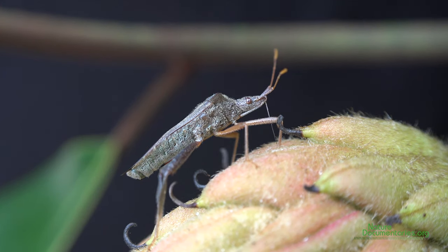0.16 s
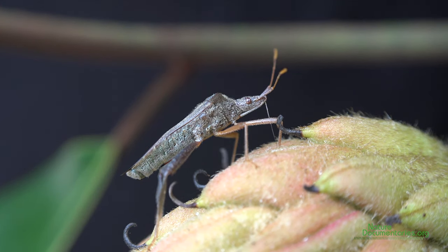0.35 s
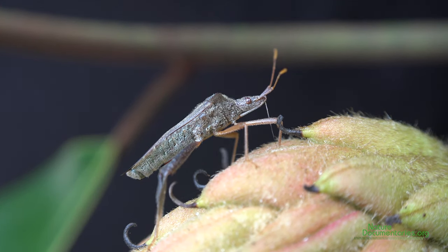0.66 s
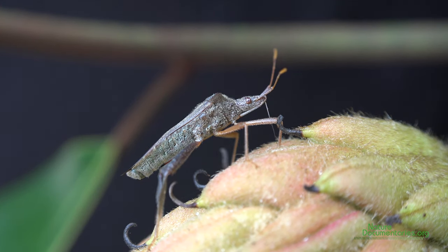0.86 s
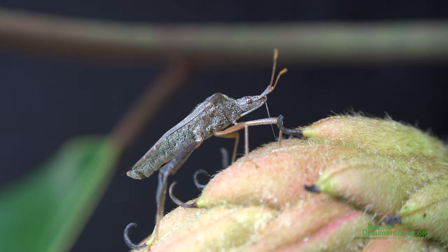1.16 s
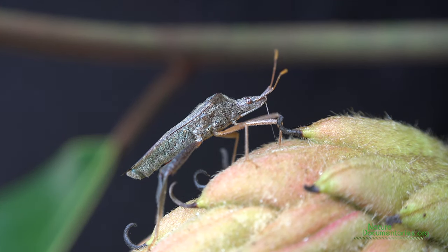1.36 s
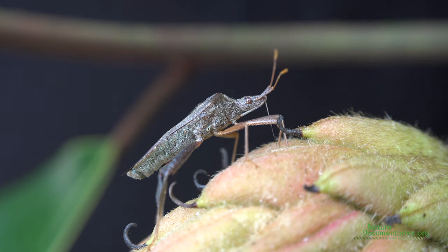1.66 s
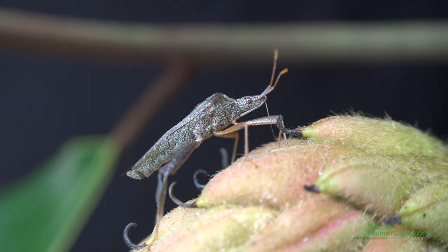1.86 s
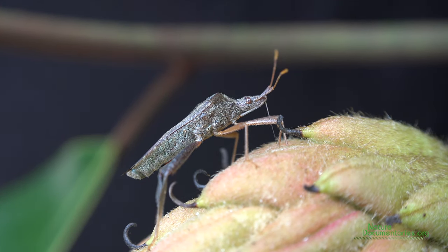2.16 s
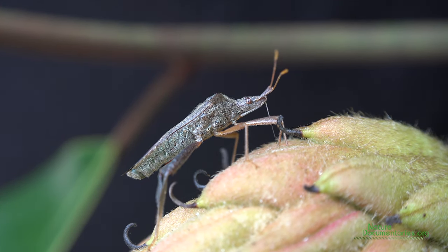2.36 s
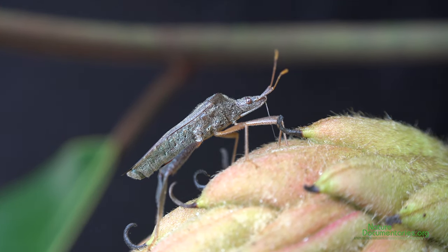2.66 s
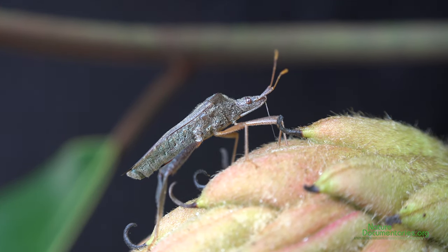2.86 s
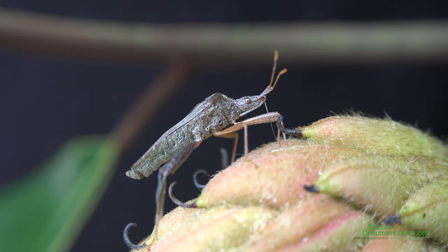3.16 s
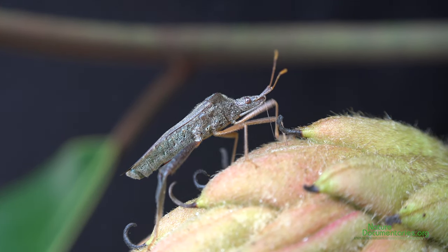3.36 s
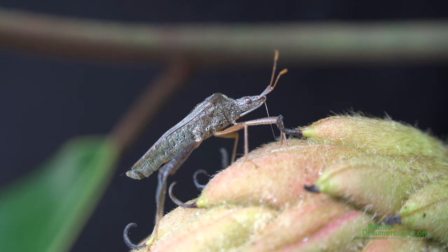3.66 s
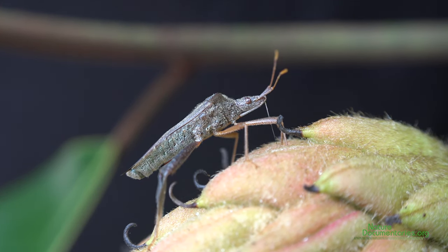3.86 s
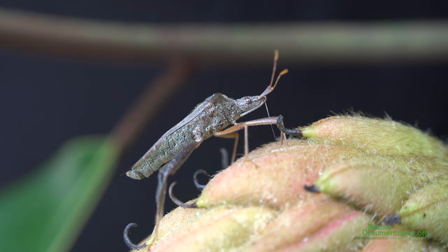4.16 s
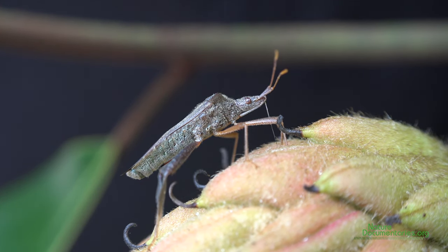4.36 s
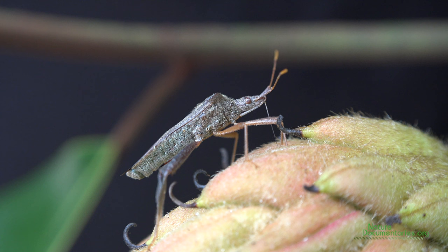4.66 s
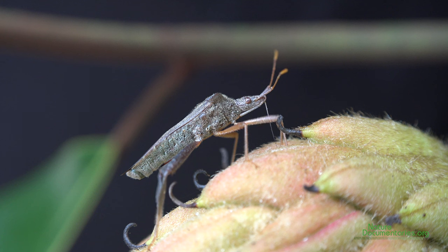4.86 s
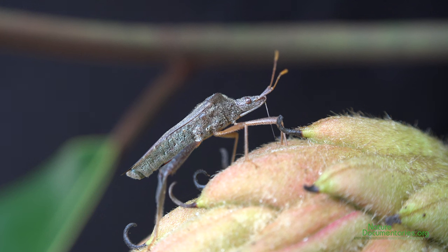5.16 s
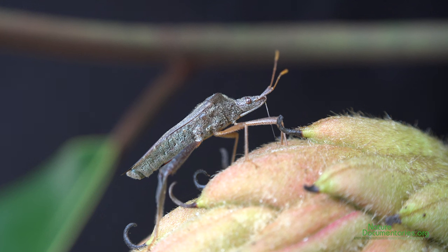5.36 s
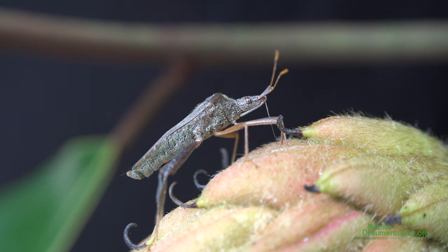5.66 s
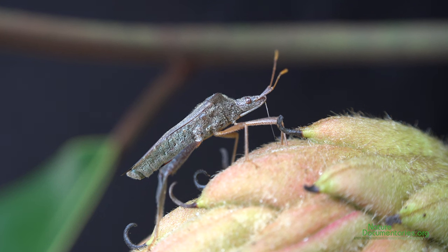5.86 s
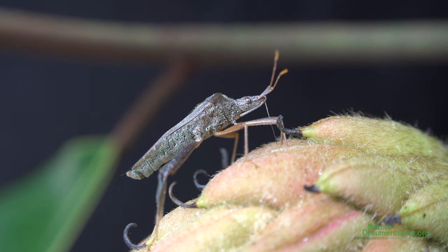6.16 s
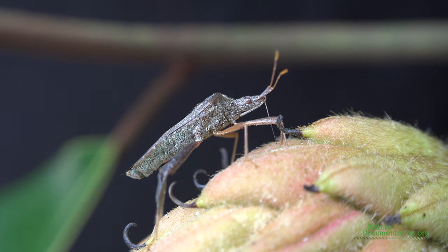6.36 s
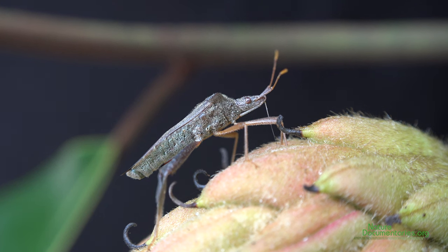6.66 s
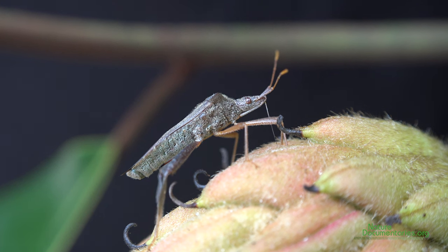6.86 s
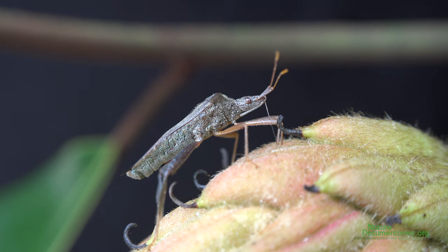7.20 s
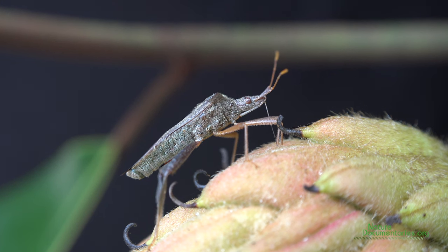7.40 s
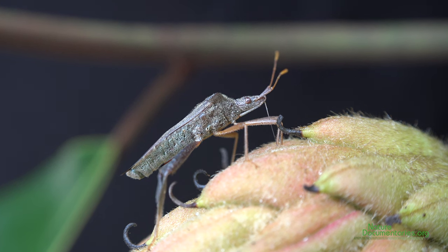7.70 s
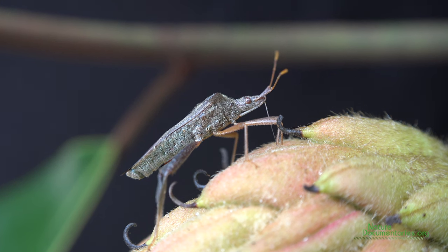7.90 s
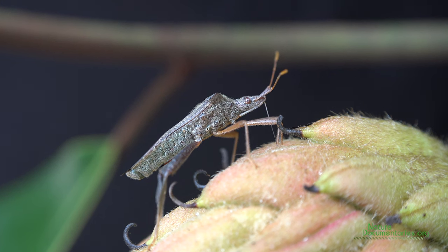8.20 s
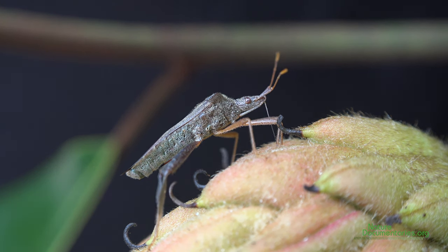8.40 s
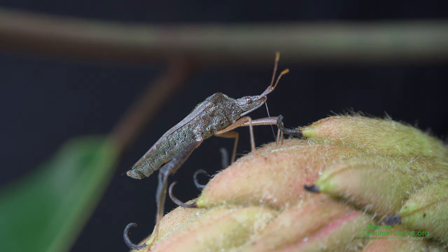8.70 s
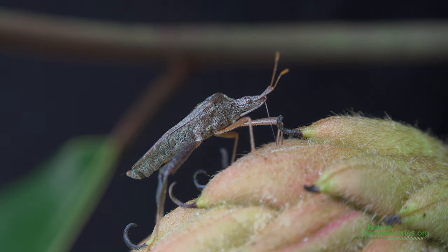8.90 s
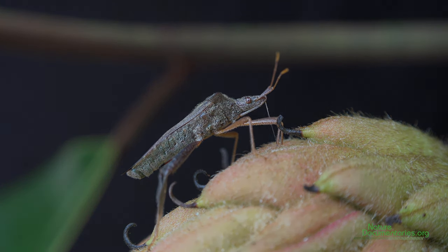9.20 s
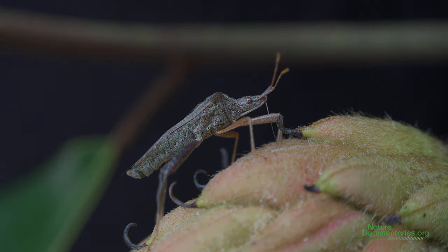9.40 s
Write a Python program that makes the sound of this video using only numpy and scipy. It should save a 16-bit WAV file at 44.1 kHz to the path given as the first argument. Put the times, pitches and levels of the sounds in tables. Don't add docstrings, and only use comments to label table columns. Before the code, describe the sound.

A near cricket chirps in bright, regular high-pitched bursts over a shimmering distant insect chorus, while traffic recedes and small twigs tick.

```python
import sys
import numpy as np
from scipy import signal
from scipy.io import wavfile
from scipy.ndimage import uniform_filter1d, minimum_filter1d

SR = 44100
rng = np.random.default_rng(int(sys.argv[2]) if len(sys.argv) > 2 else 0)


def dump(signal):
    limited = np.clip(np.atleast_2d(signal).T, -1, 1)
    pcm = np.round(limited * 32767).astype(np.int16)
    wavfile.write(sys.argv[1], SR, pcm)


def attenuation_scalar(level_db):
    decades = np.asarray(level_db, float) / 20
    return 10 ** decades


N = 420707
TIME = np.arange(N) / SR

# last stroke t/s, stroke rate f/Hz
CHIRPS = [(.0581, 72), (.7496, 71), (1.4433, 70.8), (2.1319, 70.75), (2.7863, 71), (3.4853, 70.7),
          (4.4209, 70.3), (5.1382, 71.1), (5.7883, 70.3), (6.4546, 71.2), (7.1267, 71.1), (7.7569, 71.7),
          (8.408, 70.1), (9.0563, 70.75), (9.624, 70.75)]
# number of strokes, level/dB
EFFORT = [(18., -36.5), (17.2, -37), (18.6, -38.5), (20.1, -39), (17.7, -38.5), (17.8, -39), (20.9, -37.5),
          (20.6, -38), (16.6, -37.5), (21.4, -37.5), (21.5, -39.5), (18.4, -38), (21, -40.5), (15.3, -39),
          (12., -36.5)]
# f/Hz, width/Hz, level/dB
WING_MODES = [(6770, 130, 5), (6220, 180, -0.5), (7130, 97, 5), (6180, 440, -19.5)]
# f/Hz, level/dB
SINGERS = [(5550, -34), (5800, -13.5), (6100, -9), (6400, 3.5), (6600, -1), (6760, 3), (6900, -5.5),
           (7200, -2), (7500, -6), (7650, -36)]
# end of chirp t/s, level above the blur/dB
HIGH_CHIRPS = [(.03, -2), (.8, 4), (1.52, 1.5), (2.25, 6.5), (3.0, 3), (3.76, 5), (4.5, 3), (5.2, 4),
               (6.05, 4.5), (6.82, 5), (7.5, 2), (8.3, 2), (9.05, 2)]
MIDDLE_CHIRPS = [
    (.3, 6.1),
    (2.4, 2.1),
    (3.02, 1.7),
    (5.44, 3.3),
    (6.03, 3.1),
    (7.38, 2.5),
]
# f/Hz, density level/dB
ROAR = [(180, -27), (300, -1.5), (379, -5.5), (508, -3), (681, -3), (809, 0.5), (2440, -12.5), (2690, -14),
        (4830, -20), (5330, -16.5), (5600, -13.5), (7280, -63), (12300, -120)]
# f/Hz, density level/dB
RUMBLE = [(12, -36), (20, -23.5), (54, -1), (81, -2), (135, -5.5), (184, -6), (246, -9), (302, -17),
          (420, -16.5), (550, -62), (920, -120)]
# t/s, level/dB
DRONE = [(0.0, -64), (0.26, -47.5), (0.69, -61), (0.9, -43.5), (1.2, -47.5), (1.54, -55), (1.7, -48.5),
         (3.5, -57), (4.04, -55.5), (4.38, -62), (4.67, -48), (5.25, -56), (5.61, -50.5), (6.06, -55.5),
         (6.5, -51.5), (7.35, -58), (7.6, -53), (9.3, -50)]
# t/s, hum level/dB, second harmonic level/dB
HUM = [(0.0, -60, -55), (0.5, -73, -58.5), (0.8, -70, -53), (1.1, -71, -58), (1.35, -75, -70),
       (1.6, -60, -56.5), (2.2, -62, -70.5), (2.87, -54, -66.5), (3.69, -56.5, -62), (4.12, -65.5, -73),
       (4.86, -58.5, -64.5), (5.66, -57, -65.5), (6.2, -68, -64.5), (6.6, -58, -65.5), (7.04, -53.5, -68),
       (8.0, -57, -83), (8.3, -69.5, -79), (9.54, -60.5, -69.5)]
# t/s, peak level/dB, ring f/Hz, decay t60/s
TWIGS = [
    (0.8033, -28, 2610, 0.032),
    (1.272, -44, 2510, 0.025),
    (2.098, -45.5, 2996, 0.11),
    (2.63, -48, 2500, .015),
    (2.6764, -43.5, 2400, 0.034),
    (3.27, -51, 2900, .02),
    (7.326, -46, 4400, 0.022),
    (9.5154, -49.5, 4130, 0.014),
]
# f/Hz, density level/dB
HISS = [(1500, -6), (4500, -3.5), (6500, -8.5), (8300, 2.5), (9000, -1), (11400, 0.5), (12000, -5),
        (12400, -36)]
# f/Hz, left-right likeness
SAME = [(60, 0.99), (110, 0.99), (200, 0.95), (350, 0.89), (640, 0.92), (1150, 0.99), (2080, 1.0),
        (3750, 0.99), (6770, 0.78), (12200, 0.31)]
# f/Hz, left minus right level/dB
LEAN = [(60, -1), (110, -1.2), (200, 0.5), (350, 1), (640, 0.3), (1150, -0.3), (2080, 0), (3750, -1),
        (6770, 2), (12200, -2)]
# t/s, level/dB
FADE = [(0, 0), (8.35, 0.5), (8.7, -2), (9.1, -6), (9.54, -12)]
# f/Hz, band level over amplitude step/dB
STEPS = [(200, 22), (800, 16), (1600, 9), (2300, 2), (3000, -4), (4000, -5.5), (5400, -6), (6000, 9),
         (6600, 22), (7250, 22), (7900, -3), (9300, -7.5), (11500, -7)]
# f/Hz, level relative to that band/dB
SHADOW = [(2500, -40), (4500, -28.5), (5400, -28), (6000, -35), (7250, -40), (7920, -18), (8610, -25),
          (9300, -40)]
BANDS = np.r_[0:96:8, 96:144:12, 144, 160, 176, 196, 216, 240, 264, 292, 320:577:32]


def evened(x):
    return x / np.sqrt(np.mean(abs(x) ** 2) + 1e-20)


def read(points, hz):
    f, value = np.transpose(points)
    return np.interp(np.log(hz + 1), np.log(f + 1), value)


def curves(rows):
    s, *columns = np.transpose(rows)
    return [np.interp(TIME, s, c) for c in columns]


def resonate(x, hz, width):
    turn = np.exp(2j * np.pi * np.cumsum(hz * np.ones(len(x))) / SR)
    r = np.exp(-np.pi * width / SR)
    return 2 * turn * signal.lfilter([1 - r], [1, -r], x / turn)


def drift(seconds):
    return evened(signal.lfilter([1], [1, -np.exp(-1 / (seconds * SR))], rng.standard_normal(N)))


def wash(shape, patchy_db):
    frames, hz = N // 512 + 5, np.fft.rfftfreq(2048, 1 / SR)
    a, b, c, d, patches = rng.standard_normal((frames, 1025, 5)).T
    patches = uniform_filter1d(patches, size=14, axis=0)
    patches = evened(uniform_filter1d(patches, size=8, axis=1))
    same = np.clip(read(SAME, hz), -1, 1)[:, None]
    left = a + 1j * b
    right = same * left + np.sqrt(1 - same ** 2) * (c + 1j * d)
    z = np.array([left, right]) * attenuation_scalar(read(shape, hz)[:, None] + patchy_db * patches)
    z *= attenuation_scalar(np.outer([.5, -.5], read(LEAN, hz)))[:, :, None]
    return evened(signal.istft(z, nperseg=2048, noverlap=1536)[1][:, :N])


def field(x, t60, same):
    t = np.arange(SR // 4) / SR
    both, left, right = rng.standard_normal((3, len(t))) * (t > .002) * attenuation_scalar(-60 * t / t60)
    tail = np.sqrt(same) * both + np.sqrt(1 - same) * np.array([left, right])
    x = x * np.minimum(TIME / .004, 1)
    return signal.fftconvolve(x[None], tail / np.linalg.norm(both), axes=1)[:, :N]


def pair(z, left_db, right_db, turn):
    return np.array([attenuation_scalar(left_db) * (z * np.exp(1j * turn)).real, attenuation_scalar(right_db) * z.real])


def phrases(rows, seconds):
    total_db = 0
    for end, db in rows:
        swell = 3 * (TIME - end + seconds) / seconds
        stop = (end - TIME) / 0.016 + 1
        total_db = total_db + db * np.clip(np.minimum(swell, stop), 0, 1)
    return total_db


def steady_hiss():
    return attenuation_scalar(-65.5) * wash(HISS, 0.96)


def engine_drone():
    hz = 74.1 + 7 * np.exp(-TIME / 1.8)
    drone = resonate(resonate(rng.standard_normal(N), hz, 6.5).real, hz, 6.5)
    drone = evened(drone / abs(drone + 1e-9) ** .45)
    return pair(attenuation_scalar(curves(DRONE)[0] - 2.5) * drone, 1.5, 1.9, 0.075)


def engine_hum():
    first_db, second_db = curves(HUM)
    hz = 130.15 - .4 * TIME
    turns = np.cumsum(hz + 1.3 * drift(0.085)) / SR
    first = pair(attenuation_scalar(first_db) * np.exp(2j * np.pi * turns), 0.6, 0.82, 0.15)
    second = pair(attenuation_scalar(second_db) * np.exp(4j * np.pi * turns), 3.1, -0.82, 0.4)
    return first + second


def traffic():
    double_s = 2.66
    far_db = -20 * np.log10(1 + TIME / double_s)
    roar = attenuation_scalar(-46.5 + far_db) * wash(ROAR, 0.96)
    rumble = attenuation_scalar(-49 + 0.66 * far_db) * wash(RUMBLE, 1.5)
    return roar + rumble + engine_drone() + engine_hum()


def chorus(count=64):
    ends = np.transpose(CHIRPS)[0]
    until = ends[np.searchsorted(ends, TIME)] - TIME
    join_db = 3 * uniform_filter1d(np.exp(-(until / .25) ** 2), size=900)
    levels_db = [-53 + join_db,
                 -49 + phrases(MIDDLE_CHIRPS, 0.19) + join_db,
                 -56 + phrases(HIGH_CHIRPS, 0.27)]
    low_db, middle_db, high_db = [db + .5 * evened(uniform_filter1d(drift(0.052), size=3000))
                                  for db in levels_db]
    out = np.zeros((2, N))
    wobble, tempo = drift(.006), uniform_filter1d(drift(.05), size=2000)
    for hz, (a, b, side) in zip(np.linspace(5550, 7480, count), rng.random((count, 3)) - .5):
        shift = int(b * N)
        turns = (68 + 25 * a) * TIME + .3 * np.roll(tempo, shift)
        stroke = np.maximum(np.sin(2 * np.pi * turns) + 0.32, 0)
        pitch_hz = hz - 250 * (turns % 1 - .25) + 70 * np.roll(wobble, shift)
        tone = stroke * np.exp(2j * np.pi * np.cumsum(pitch_hz) / SR)
        group_db = low_db if hz < 6550 else middle_db if hz < 7030 else high_db
        phase = (1.3 + 3.9 * (hz > 6950)) * side - .25
        out += pair(tone * attenuation_scalar(read(SINGERS, hz) + group_db), 3 * side - .6, .6 - 3 * side, phase)
    return attenuation_scalar(-5.5) * out


def twigs():
    out, t = np.zeros(N + 2000), np.arange(2000) / SR
    for s, db, hz, t60 in TWIGS:
        ring = np.minimum(t / 0.00024, 1) * attenuation_scalar(-60 * t / 0.0022) * np.sin(2 * np.pi * hz * t)
        ring += 0.24 * attenuation_scalar(-60 * t / 0.0009) * np.sin(3.1 * np.pi * hz * t)
        ring += 0.22 * attenuation_scalar(-60 * t / 0.0024) * np.sin(1.35 * np.pi * hz * t)
        impulses = np.zeros(2000)
        impulses[[0, 34, 68, 96, 150, 290]] = .3, .15, .15, 1, .3, -.25
        impulses += 0.045 * rng.standard_normal(2000) * attenuation_scalar(-60 * t / (3 * t60)) * (t > .003)
        part = out[round((s - .0011) * SR):][:2000]
        part += attenuation_scalar(db + 12.5) * np.convolve(impulses, ring)[:len(part)]
    return out[:N] * attenuation_scalar([[.4], [-.4]])


def ticking_cricket():
    count = 19.789 * TIME - .36
    off_centre = (count + .5) % 1 - .5
    stroke = np.exp(-.5 * (off_centre / .095) ** 2) * attenuation_scalar(2.0 * drift(0.018))
    tone = stroke * np.exp(2j * np.pi * np.cumsum(6757 + 8 * drift(.03)) / SR)
    return attenuation_scalar(-46) * (pair(tone, -2, 0.43, -2.4) + attenuation_scalar(2.0) * field(tone.real, 0.27, .85))


def near_cricket():
    order = np.arange(30)
    stroke = np.arange(500) / SR
    shape = np.sin(np.pi * np.minimum(stroke / 0.0064, 1)) ** 1.3
    kicks, since = np.zeros(N), np.zeros(N)
    for (last, rate), (strokes, db) in zip(CHIRPS, EFFORT):
        at = last - .003 - order / rate - .006 * (1 - np.exp(-order / 2.5))
        swell_db = -1.6 * np.maximum(order - strokes + 7, 0) ** 0.82 + 0.7 * rng.standard_normal(30)
        ok = (at >= 0) & (at < TIME[-1])
        index = (at[ok] * SR).astype(int)
        kicks[index] = attenuation_scalar(db + swell_db[ok])
        since[index] = at[ok]
    since = TIME - np.maximum.accumulate(since)
    tooth_hz = 6840 - 15000 * np.minimum(since, .012) + 45 * drift(0.00305)
    teeth = np.sqrt(2) * np.cos(2 * np.pi * np.cumsum(tooth_hz) / SR) + 1.6 * rng.standard_normal(N)
    drive = signal.oaconvolve(kicks, shape)[:N] * teeth
    wing = np.zeros(N, complex)
    for hz, width, db in WING_MODES:
        wing += attenuation_scalar(db) * resonate(resonate(drive, hz, 2 * width).real, hz, width)
    return pair(wing, -1.1, 1.0, -0.13) + attenuation_scalar(-21) * field(wing.real, 0.24, 0.56)


def scene():
    background = steady_hiss() + traffic() + chorus()
    faded = (background + ticking_cricket() + near_cricket()) * attenuation_scalar(curves(FADE)[0])
    return faded + twigs()


def stepped(x):
    k, n = np.arange(576) + .5, np.arange(2048) + .5
    window = np.sin(np.pi * n / 2048)[:, None]
    basis = window * np.cos(np.pi / 1024 * np.outer(n + 512, k)) / np.sqrt(512)
    lead = 2048 - 309
    both = np.pad([x[0] + x[1], x[0] - x[1]], ((0, 0), (lead, 4096)))
    at = np.arange(both.shape[1] // 1024 - 1)[:, None] * 1024 + np.arange(2048)
    c, wide = both[:, at] @ basis, np.diff(BANDS)
    hz = (BANDS[:-1] + wide / 2) * SR / 2048
    power = uniform_filter1d(np.add.reduceat(c ** 2, BANDS[:-1], axis=2) / wide, size=3, axis=1)
    power = np.where(hz > 7500, power, power.sum(0))
    loudest = power[0][:, hz > 4000].max(1, keepdims=True)
    power = minimum_filter1d(power, size=5, axis=1)
    step = np.sqrt(power / attenuation_scalar(2 * read(STEPS, hz)) + loudest * attenuation_scalar(2 * read(SHADOW, hz)))
    whim = evened(uniform_filter1d(rng.standard_normal(step.shape[1:]), size=2, axis=0))
    step = np.repeat(step * attenuation_scalar(2 * whim), wide, axis=2) + 1e-12
    frames = (np.sign(c) * np.floor(abs(c) / step + .4054) * step) @ basis.T
    out = np.zeros_like(both)
    for start in (0, 1024):
        half = frames[:, :, start:start + 1024].reshape(2, -1)
        out[:, start:start + half.shape[1]] += half
    mid, side = out[:, lead:lead + N] / 2
    return np.array([mid + side, mid - side])


def top_cut(x):
    return signal.sosfilt(signal.butter(12, 12820, fs=SR, output="sos"), x)


def record(dry):
    limit = signal.firwin(801, 12000, window=("kaiser", 10), fs=SR)
    mix = stepped(signal.oaconvolve(dry, limit[None], "same"))
    return top_cut(mix)


dry = scene()
out = record(dry)
dump(out)
```